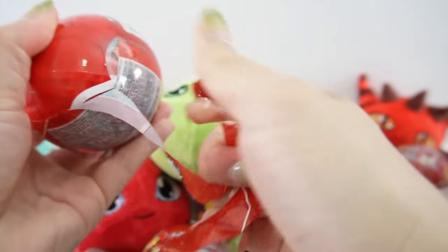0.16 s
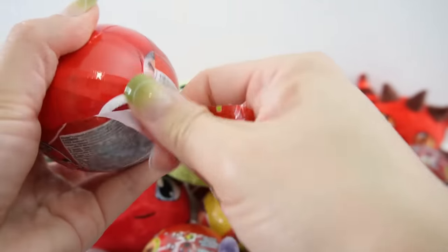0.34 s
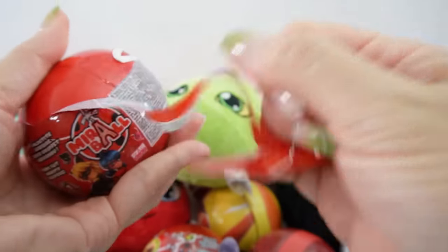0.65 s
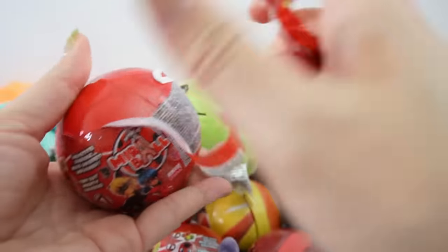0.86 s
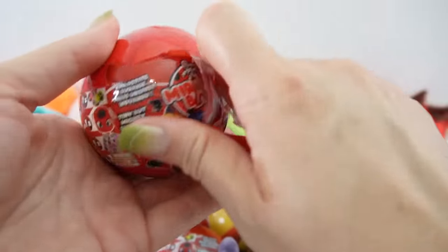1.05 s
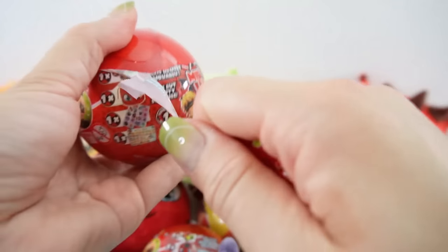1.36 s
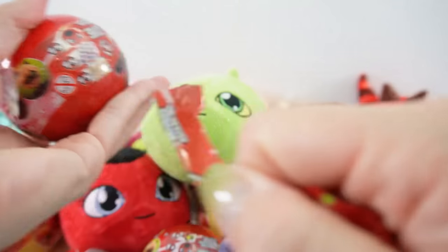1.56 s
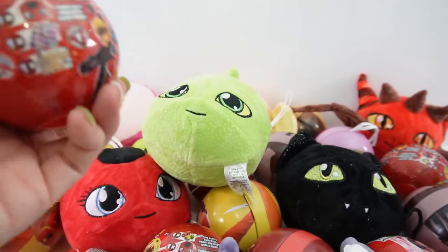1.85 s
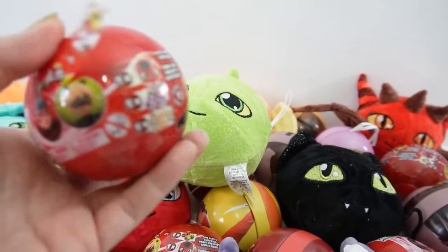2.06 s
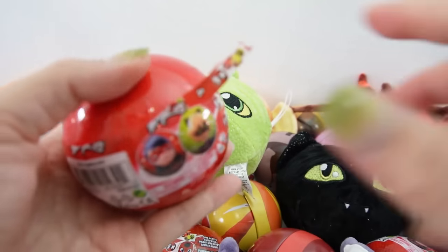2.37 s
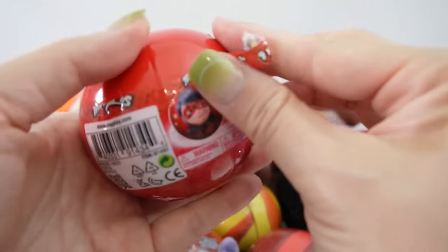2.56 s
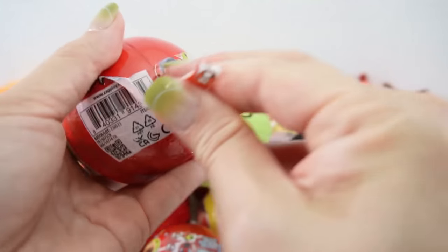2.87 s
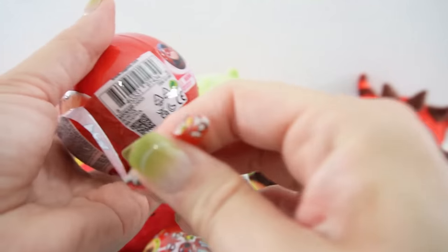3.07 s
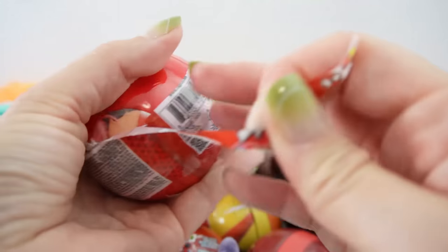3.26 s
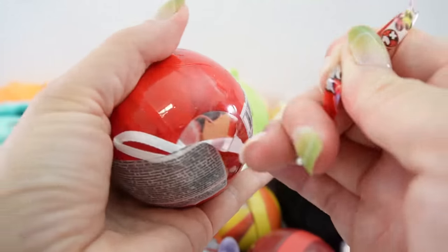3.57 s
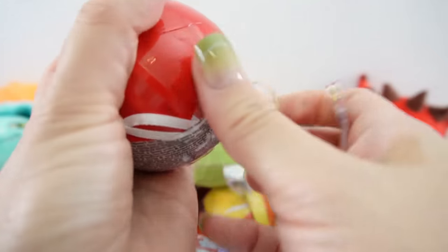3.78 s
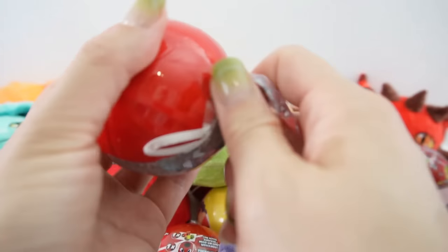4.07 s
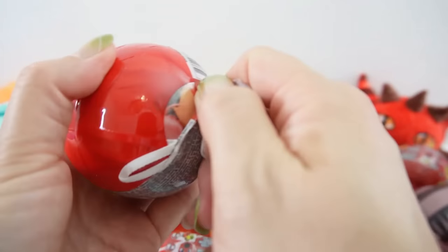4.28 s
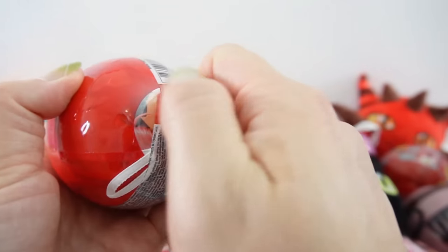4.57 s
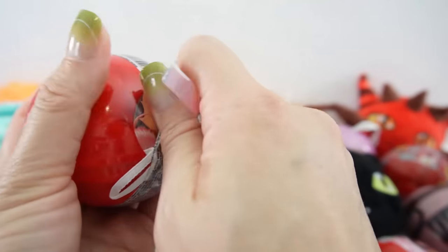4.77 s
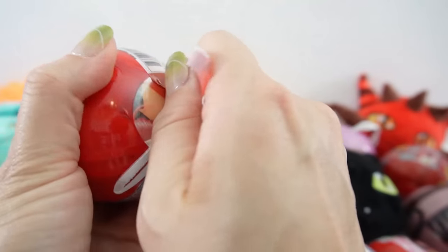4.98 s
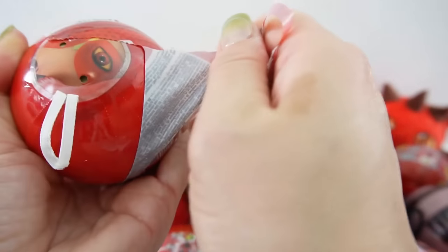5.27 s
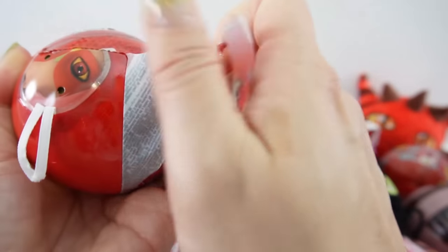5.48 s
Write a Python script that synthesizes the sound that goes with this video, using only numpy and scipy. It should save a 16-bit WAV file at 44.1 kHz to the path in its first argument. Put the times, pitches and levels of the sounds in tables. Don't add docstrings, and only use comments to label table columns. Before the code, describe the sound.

Tight plastic film is peeled off a hollow ball in loud, sharp crackling bursts, eases to faint picking, then rips loudly again.

```python
import sys
import numpy as np
from scipy import signal
from scipy.fft import rfft, irfft, next_fast_len
from scipy.io import wavfile
from scipy.ndimage import uniform_filter1d, map_coordinates

SR = 44100
rng = np.random.default_rng(int(sys.argv[2]) if len(sys.argv) > 2 else 0)


def to_linear_factor(level_db):
    exponent = np.asarray(level_db, float) / 20
    return 10 ** exponent


def materialize(psi):
    bounded = np.clip(np.atleast_2d(psi).T, -1, 1)
    quanta = np.round(bounded * 32767).astype(np.int16)
    wavfile.write(sys.argv[1], SR, quanta)


N = 248283

# pitch_hz, level_db [dB per Hz]
HISS_COLOUR = [(12, -51), (20, -15), (237, -4.5), (452, -13), (566, -1.5), (750, -14.5), (1840, -14.5),
               (3420, -18), (15200, -27), (16500, -24)]
# pitch_hz, width_hz, level_db
FAN_TONES = [(235, 67, -29), (573.3, 14.5, 15)]
# pitch_hz, likeness [0-1]
HUM_LIKENESS = [(60, 0.93), (290, 0.74), (1400, 0.48), (15000, 0.19)]
# peak_s, rustle_db, rise_s and fall_s [time to change by 20 dB]
FINGER_PULLS = [(.136, -19, 0.2, 0.17), (.477, -33.5, 0.57, 0.048), (.672, -20, 0.15, 0.13),
                (.814, -33, 0.063, 0.16), (0.976, -26.5, 0.036, 0.045), (1.101, -23.5, 0.11, 0.1),
                (1.285, -14, 0.04, 0.056), (1.477, -17.5, 0.026, 0.058), (1.512, -19, 0.02, 0.14),
                (1.68, -29.5, 0.033, 0.13), (2.009, -25.5, 0.44, 0.033), (2.185, -27.5, 0.11, 0.11),
                (2.255, -34, 0.025, 0.33), (2.409, -40.5, 0.042, 0.087), (2.6, -54, 0.047, 0.069),
                (2.69, -42, 0.038, 0.02), (2.84, -38, 0.065, 0.028), (2.926, -27, 0.021, 0.1),
                (3.225, -27, 0.027, 0.012), (3.424, -44.5, 0.36, 0.12), (3.508, -44, 0.089, 0.046),
                (3.645, -40.5, 0.05, 0.073), (3.7, -26.5, 0.059, 0.11), (4.092, -32, 0.025, 0.044),
                (4.186, -33, 0.034, 0.14), (4.268, -47, .01, 0.12), (4.325, -62, .2, .025),
                (4.495, -47, .01, 0.11), (4.575, -31.5, 0.059, 0.11), (4.785, -38, 0.026, 0.065),
                (4.816, -43, 0.049, 0.011), (5.094, -32.5, 0.15, 0.2), (5.29, -30.5, 0.075, 0.054),
                (5.471, -19.5, 0.033, 0.15)]
# time_s, tension [-1 slack to 1 tight]
FILM_TENSION = [(0, -0.91), (.14, -0.95), (.3, -0.035), (.45, -0.34), (.67, -0.23), (.95, -1.06),
                (1.1, -0.17), (1.5, -0.054), (2.55, -1.08), (2.69, 0.8), (2.8, -0.45), (3.2, 0.48),
                (3.42, 0.017), (3.65, -0.19), (4.3, 0.73), (4.8, 0.31), (5.09, 0.86), (5.63, -0.11)]
# pitch_hz, level_db [dB per Hz]
FILM_COLOUR = [(88, -44), (150, -32), (371, -15), (881, -11.5), (1050, -9), (1440, -9.5), (2700, -3.5),
               (5170, -2), (12800, -10), (15600, -17.5), (16500, -45)]
# start_s, peak_db,
# pitch_hz, top_db [treble]
FILM_CREASES = [(0.026, -24, 3060, -12), (0.043, -20, 2520, -54), (0.0555, -11.5, 2470, -16),
                (0.0598, -4.5, 2540, -9.5), (0.0767, -5.5, 6850, 4), (0.1032, -15, 2370, -27),
                (0.1275, -6.5, 4400, -26), (0.136, -10, 5400, -12), (0.1465, -10.5, 8400, 1),
                (0.1604, -6.5, 8800, -22), (0.1825, -9.5, 6700, -2), (0.194, -1.5, 3340, -9),
                (0.2351, -4, 5100, -7), (0.257, -3.5, 3400, -18), (0.268, -12, 2420, -15),
                (0.3037, -7.5, 5150, -5), (0.3364, -4, 5950, -1), (0.3459, -6.5, 6440, -7),
                (0.3614, -17, 4230, -20), (0.3848, -8, 4940, -7.5), (0.4047, -12, 2210, 0),
                (0.4228, -4.5, 2600, -13), (0.45, -31, 1960, -31), (0.4587, -6, 4400, -7),
                (.4673, -9.5, 5700, -4), (0.4842, -4.5, 2340, -9.5), (0.4922, -12.5, 3500, 1),
                (0.5192, -12.5, 5700, 1),
                (0.563, -18, 5070, -15), (0.575, -12.5, 3950, -14), (0.5887, -11.5, 2350, -22),
                        (0.6145, -5.5, 2430, -22), (0.6386, -6, 8300, -6), (0.653, -7, 4800, -20),
                        (0.6694, -7.5, 4800, -25), (0.7125, -5.5, 2320, -9), (0.7305, -5, 3300, -6.5),
                        (0.7844, -6.5, 4700, -15), (0.8083, -4, 3160, -1.5), (0.8168, -3, 4800, -2),
                        (0.847, -14, 2420, -8), (0.8591, -11.5, 5300, -16), (0.8862, -13.5, 2840, -6),
                        (0.9436, -13, 4500, -4), (1.0106, -25, 8500, -7), (1.076, -11, 2870, 4),
                        (1.099, -13, 5150, -10), (1.1068, -9.5, 5050, -10), (1.1258, -10, 4900, -15),
                        (1.135, -7.5, 4800, -12),
                (1.226, -26, 5700, -9), (1.2395, -15.5, 3560, -2), (1.266, -8.5, 4400, 4),
                       (1.269, -6, 2840, -6), (1.2942, -19, 4500, 5), (1.3127, -12.5, 2250, -6),
                       (1.41, -16.5, 2400, -13), (1.442, -4, 3070, 2.5), (1.4883, -16, 7800, 4),
                       (1.5048, -6, 6600, 3), (1.5096, -6.5, 2320, -3), (1.5272, -11, 6070, -11),
                       (1.5328, -2, 6900, -11), (1.5765, -5.5, 4350, -18), (1.5903, -5, 4250, -9),
                       (1.6681, -3, 4000, -8), (1.6806, -9, 5600, -16), (1.7379, -8, 5250, -2),
                       (1.7813, -19.5, 4600, -16), (1.81, -9.5, 5540, -15), (1.8245, -16, 2820, -8),
                       (1.8525, -24, 1720, -27),
                (1.899, -19, 5000, -21), (1.9164, -16, 5630, -11), (1.936, -13, 4170, -3),
                   (1.9827, -21.5, 8060, 18), (2.0891, -26.5, 4500, -12), (2.186, -15, 7900, -23),
                   (2.251, -29, 6760, -28), (2.4008, -26, 2800, -35), (2.4478, -27.5, 5000, -29),
                   (2.55, -27.5, 3330, -31), (2.7606, -33, 2730, -4), (2.8001, -32, 3500, -29),
                   (2.891, -34, 3080, -43), (2.908, -23, 3700, -15), (2.915, -21, 3600, -11),
                   (2.923, -22, 3080, -2), (2.934, -19, 3600, -15), (2.948, -21, 3260, -24),
                   (2.98, -19, 3050, -12),
                (3.0597, -29, 3770, -15), (3.097, -22, 3560, -9), (3.218, -18.5, 5200, 1),
                   (3.3355, -22, 3050, -20), (3.4184, -25.5, 2520, -8), (3.44, -27, 3730, 1),
                   (3.513, -22, 8540, -6), (3.652, -21.5, 3220, -12), (3.6907, -11, 9600, -11.5),
                   (3.713, -25, 4320, -11), (3.724, -24, 2460, -16), (3.745, -22, 5050, 0),
                   (3.909, -32, 3420, -26), (4.089, -27, 7000, -10), (4.0972, -16, 6500, -4),
                   (4.162, -22.5, 4700, -15), (4.177, -8.5, 5400, -12), (4.181, -10, 8100, -9),
                   (4.2626, -19, 7150, -1), (4.288, -27, 7350, 7), (4.4352, -36, 6200, 1),
                   (4.4867, -36, 7650, -1), (4.5494, -22, 5300, -7), (4.5629, -7, 4400, 6.5),
                   (4.5935, -14, 5200, -2), (4.6242, -20.5, 4000, -7), (4.712, -35.5, 4800, -4),
                   (4.7792, -32, 2520, -7), (4.803, -25.5, 5300, -6), (4.8362, -33.5, 1890, -6),
                (4.9864, -8.5, 8450, -13), (5.0397, -7.5, 4670, -2.5), (5.061, -7, 5600, -2),
                      (5.081, -5, 2760, -11), (5.185, -10.5, 6800, -18), (5.228, -8, 7500, -21),
                      (5.251, -8, 5840, -13), (5.292, -18.5, 5360, -26), (5.4324, -13, 5350, -15),
                      (5.4376, 0.5, 5500, -13.5), (5.4601, -5, 5330, -5.5), (5.4752, -7.5, 6600, 0),
                      (5.4915, 0.5, 6540, -16.5), (5.4936, -5, 4600, -17), (5.619, -4, 8200, -13)]
# pitch_hz, t60_s [time to fall 60 dB]
ROOM_DECAY = [(300, 0.32), (2000, 0.19), (6000, 0.29), (15000, 0.38)]
# start_s, length_s, level_db, from_hz, to_hz
FILM_DRAGS = [(0.096, 0.066, -45.5, 404, 263), (0.445, 0.014, -48.5, 303, 191),
              (1.264, 0.033, -33.5, 4270, 4190), (1.289, 0.033, -33.5, 2750, 2434),
              (1.478, 0.027, -27.5, 2452, 2810), (1.956, 0.0708, -38, 2733, 3070),
              (2.767, 0.041, -53, 3505, 3430), (2.823, 0.038, -47, 2915, 1874),
              (2.836, 0.027, -44.5, 3400, 2950), (2.825, 0.038, -51, 5420, 5200),
              (2.918, .055, -31, 3000, 3810), (4.267, 0.056, -42, 9500, 10380),
              (4.49, 0.081, -48.5, 8570, 7960), (4.767, 0.048, -44.5, 7950, 8370),
              (1.477, 0.021, -25, 8000, 8200), (5.083, 0.069, -43.5, 2810, 2600),
              (5.239, 0.057, -46.5, 1800, 885), (5.485, 0.02, -47, 232, 150)]
# start_s, peak_db, pitch_hz, t60_s, sag [0-2, extra pitch at the start]
BALL_KNOCKS = [
    (0.137, -50, 295, 0.097, 0.16),
    (1.27, -50, 370, 0.052, 0.25),
    (1.296, -43, 320, 0.05, 0.2),
    (5.49, -37, 360, 0.066, 0.097),
]
# start_s, peak_db, pitch_hz,
# top_db [treble]
SHORT_TICKS = [(0.3827, -16, 2480, -1), (0.2314, -8, 4360, -14), (0.2526, -10.5, 2500, -8),
                (0.299, -18, 3230, -18), (0.3075, -12.5, 3530, -7), (0.359, -13.5, 4390, -15),
                (0.431, -30, 2840, -12), (0.4794, -19, 2890, -7), (0.5031, -25, 4200, 3),
                (0.509, -23, 5210, -5), (0.5384, -27, 7620, -1), (0.5559, -27, 3960, 4),
                (0.559, -23, 4550, -8), (0.5626, -12.5, 7500, -10), (0.5964, -18, 4870, -14),
                (0.396, -19, 2260, -12), (0.679, -19, 4350, -13), (0.7043, -25, 7280, -2),
                (0.749, -19, 6030, 0), (0.7843, -13, 2800, -10), (0.9302, -26, 1950, -6),
                (0.965, -25, 3880, -13), (1.0947, -22, 5210, -11), (1.1033, -15, 5700, -18),
                (1.1169, -22, 3790, -14), (1.1305, -11, 3900, -7), (1.1556, -19, 3790, -5),
                (1.4007, -31, 4010, -11), (1.4784, -11.5, 2840, 1), (1.5062, -6, 2320, -11),
                (1.602, -14, 4390, -10), (1.6131, -31, 4220, -9), (1.6226, -20, 4740, -14),
                (1.707, -22, 3920, -20), (1.72, -21, 3270, -15), (1.724, -22, 2500, -3),
                (1.7301, -22, 3630, -9), (1.796, -22, 5600, -9), (1.8197, -25.5, 2790, -14),
                (1.8542, -21, 4700, -21), (1.8735, -27, 5430, -15), (1.9115, -26, 3750, -17),
                (1.9813, -29, 3060, -8), (2.012, -20, 3060, -2), (2.021, -18, 4200, -2),
                (2.0454, -33, 2970, -7),
                (2.0925, -24, 4100, -5), (2.1089, -29, 5640, -12), (2.1142, -26.5, 5340, -15),
               (2.171, -26, 5640, -23), (2.254, -27, 5510, -16), (2.3515, -33, 3880, -9),
               (2.4757, -34, 5170, 8), (2.508, -43, 3094, -16), (2.5194, -47, 3597, -13),
               (2.6029, -36, 2710, -14), (2.775, -37, 3400, -10), (2.7791, -46, 3400, -9),
               (2.8498, -39, 2150, -20), (2.8605, -38, 2970, -24), (2.9046, -25, 3010, -21),
               (2.9486, -14, 3300, -14), (2.9165, -12, 3000, -19), (0.411, -9.5, 1300, -23),
               (3.16, -38, 3490, -4), (3.1745, -42, 3450, -13), (3.1897, -40, 3700, -2),
               (3.213, -29, 6160, -7), (3.5157, -27, 8500, -8), (3.5402, -35, 3640, 3),
               (0.638, -14.5, 1640, -25), (3.954, -40.5, 2710, -2), (4.8045, -30.5, 2500, -8),
               (4.193, -19, 7320, -8), (4.33, -27.5, 6240, 13), (4.5634, -19.5, 2550, -5),
               (4.4914, -31.5, 7970, 1), (0.688, -24, 1700, -25), (4.7029, -35, 5600, 4),
               (4.811, -27, 8790, -9), (4.815, -39, 5470, -4), (4.8191, -26.5, 1910, -6),
               (4.9714, -47, 8910, 6), (5.001, -20, 8140, 0), (5.0778, -17, 5810, -2),
               (5.102, -15.5, 4100, -11), (5.113, -22.5, 2800, -10), (5.127, -20, 5900, -10),
               (1.2697, -12, 4970, -10), (5.2445, -24, 3080, -15), (5.4552, -12, 5380, -11),
               (5.4743, -5, 6240, -10)]
# start_s, peak_db, pitch_hz
SHELL_FLEXES = [(0.407, -20, 1120), (.42, -17, 610), (.43, -20.5, 1300), (.448, -20, 915),
                (0.589, -39, 1570), (.614, -22, 1100), (0.713, -22, 1360), (0.737, -26, 500),
                (.885, -27.5, 1270), (.941, -17.5, 1410), (1.073, -29, 1050), (4.562, -30, 1630),
                (1.299, -25, 1150), (1.442, -13, 1820), (1.528, -24, 1220), (1.669, -20, 1650),
                (1.854, -37, 1690), (5.226, -20, 1880), (5.247, -40, 1460), (5.257, -39, 1400),
                (5.282, -32, 930), (5.437, -23, 1100), (5.49, -22, 795)]
# time_s, pan_db [left minus right]
BALL_POSITION = [
    (0.0, 0.5),
    (2.43, -3.5),
    (2.73, 0),
    (5.63, -0.5),
]
# pitch_hz, likeness [0-1]
NEAR_LIKENESS = [(500, 0.99), (2000, 1), (5000, 0.89), (9000, 0.84), (14000, 0.02)]


def unit(x):
    return x / np.sqrt(np.mean(x ** 2) + 1e-20)


def along(points, hz):
    f, v = np.transpose(points)
    return np.interp(np.log(hz + 1), np.log(f + 1), v)


def curves(rows):
    s, *cols = np.transpose(rows)
    return [np.interp(np.arange(N) / SR, s, c) for c in cols]


def wobble(rate):
    points = rng.standard_normal(int(N * rate / SR) + 4)
    return map_coordinates(points, [np.arange(N) * rate / SR])


def noise_pair():
    return rng.standard_normal((2, N))


def filtered(x, response):
    size = next_fast_len(N + 8192)
    return irfft(rfft(x, size) * response(np.fft.rfftfreq(size, 1 / SR)), size)[..., :N]


def resonance(f, hz, width):
    return 1j * f * width / (hz * hz - f * f + 1j * f * width + 1e-9)


def treble_shelf(f):
    return 1 / (1 + (8000 / (f + 1)) ** 6)


def ports(pair, alike):
    def shares(hz):
        turn = np.arccos(np.clip(along(alike, hz), -1, 1)) / 2
        return np.array([np.cos(turn), np.sin(turn)])

    mid, side = filtered(pair, shares)
    return np.array([mid + side, mid - side])


def hum():
    bed = unit(filtered(noise_pair(), lambda f: to_linear_factor(along(HISS_COLOUR, f))))

    def tones(f):
        return sum(to_linear_factor(db) * resonance(f, hz, width) ** 2 for hz, width, db in FAN_TONES)

    fan = unit(filtered(noise_pair(), tones)) * to_linear_factor(6.6 * wobble(9.4))
    return ports(to_linear_factor(-54.0) * bed + to_linear_factor(-67.0) * fan, HUM_LIKENESS)


def handling():
    t = np.arange(N) / SR
    total = 0
    for s, db, rise, fall in FINGER_PULLS:
        distance = np.maximum((s - t) / rise, (t - s) / fall)
        total = total + to_linear_factor(db - 20 * distance)
    return total


def cracks(s, db, hz, ms, top_db, thump_db, size, sharp=6, ring_db=12, lumpy_db=5):
    def col(v):
        return np.asarray(v)[:, None]

    t, f = np.arange(size) / SR, np.fft.rfftfreq(2 * size, 1 / SR)
    noise = rng.standard_normal((len(s), 3, size))
    lumps = to_linear_factor(lumpy_db * 2.7 * uniform_filter1d(noise[:, 2], size=16, axis=1))
    onset = 1 - np.exp(-t / (0.00008 * col(ms)))
    fade = to_linear_factor(-11 * t / (col(ms) / 1000)) * onset * lumps
    fade = fade * (1 + 1.26 * np.exp(-t / 0.00035))
    fade = fade + 1.5 * np.exp(-((t - 0.0004) / 0.00008) ** 2)

    top = (col(top_db) + 10.5) * treble_shelf(f)
    thump = (col(thump_db) + 17.0) / (1 + (f / 1400) ** 6)
    ring = 1 + to_linear_factor(ring_db) * resonance(f, col(hz), col(hz) / sharp)
    other_hz = 2000 * 4 ** rng.random((len(s), 1))
    ring = ring - to_linear_factor(ring_db - 9.5) * resonance(f, other_hz, other_hz / sharp)
    bounce = 1 + 0.11 * np.exp(-2j * np.pi * f * 0.0027)
    colour = to_linear_factor(along(FILM_COLOUR, f) + top + thump) * ring * bounce

    margin = 64
    late = np.exp(-2j * np.pi * f * margin / SR)
    burst = irfft(rfft(noise[:, :2] * fade[:, None], 2 * size) * (colour * late)[:, None])
    power = uniform_filter1d(burst ** 2, size=40, axis=2)
    peak = np.sqrt(abs(power).max(2, keepdims=True))
    burst = burst / peak * to_linear_factor(col(db) - 3.5)[:, None]
    at = (np.round(col(s) * SR).astype(int) + np.arange(2 * size)).ravel()
    sides = [np.bincount(at, burst[:, k].ravel(), N + 4 * size) for k in (0, 1)]
    return np.array(sides)[:, margin:N + margin]


def rustle(count=2200):
    tension, = curves(FILM_TENSION)
    film_hz = 4310 * 2 ** (0.42 * tension)
    top_db = 0.5 + 4.5 * tension
    draw = rng.random((count, 4))
    s = draw[:, 0] * (N - 1) / SR
    at = (s * SR).astype(int)
    size_db = -3.5 * np.log(draw[:, 1] + 0.12) + 3.14 * wobble(45)[at]
    pitch_hz = film_hz[at] * 4.7 ** (draw[:, 2] - 0.5)
    ms = 0.64 + 7 * draw[:, 3] ** 2
    thump_db = np.full(count, -23)
    grains = unit(cracks(s, size_db, pitch_hz, ms, top_db[at], thump_db, size=256, ring_db=21.0))

    slide = unit(filtered(noise_pair(), lambda f: to_linear_factor(along(FILM_COLOUR, f))))
    fizz = filtered(slide, treble_shelf)
    slide = slide + (to_linear_factor(top_db) - 1) * fizz
    return handling() * (to_linear_factor(-6.0) * grains + to_linear_factor(-10.0) * slide)


def snaps():
    creases = (FILM_CREASES)
    s, db, hz, top_db = np.transpose(creases)
    tension = np.interp(s, *np.transpose(FILM_TENSION))
    give_ms, ring_cycles = 2.21, 4.44
    ms = (give_ms + 1000 * ring_cycles / hz) * to_linear_factor(-0.18 * (db + 6.5))
    thump_db = -28 - 0.43 * (db + 9.0) - 6.5 * tension
    return cracks(s, db, hz, ms, top_db, thump_db, size=1024, sharp=4.4, ring_db=9.5)


def room(x):
    out, step = np.zeros((2, N + SR)), 8192
    dull = filtered(x, lambda f: 1 / (1 + 1j * f / 7000))
    for a in range(0, N, step):
        hz, t, z = signal.stft(rng.standard_normal((2, SR // 2)), SR, nperseg=256)
        decay = to_linear_factor(-60 * t / along(ROOM_DECAY, hz)[:, None])
        tail = signal.istft(z * decay, SR, nperseg=256)[1]
        tail = tail * (1 - np.exp(-np.arange(tail.shape[1]) / SR / 0.0035))
        tail = tail / np.linalg.norm(tail[0])
        wet = signal.fftconvolve(dull[None, a:a + step], tail, axes=1)
        out[:, a:a + wet.shape[1]] += wet
    return out[:, :N]


def drags():
    out = np.zeros((2, N + SR))
    lumps = to_linear_factor(3 * wobble(160))
    sharp, edge_s = 7.7, 0.0044
    t = np.arange(8192) / SR
    for s, length, db, from_hz, to_hz in FILM_DRAGS:
        hz = from_hz * (to_hz / from_hz) ** np.clip(t / length, 0, 1)
        noise = rng.standard_normal((2, 2, len(t)))
        width_hz = from_hz * (1 + (from_hz / 5500) ** 4) / sharp
        keep = np.exp(-np.pi * width_hz / SR)
        sway = signal.lfilter([1], [1, -2 * keep, keep ** 2], noise[0] + 1j * noise[1])
        song = (sway * np.exp(2j * np.pi * np.cumsum(hz) / SR)).real
        thin = signal.butter(2, to_hz / 4, 'high', fs=SR, output='sos')
        song = unit(signal.sosfilt(thin, song))
        shape = np.clip(np.minimum(t, length + edge_s - t) / edge_s, 0, 1)
        out[:, round(s * SR):][:, :len(t)] += to_linear_factor(db) * shape * song
    return out[:, :N] * lumps


def knocks():
    out, t = np.zeros(N + SR), np.arange(SR // 4) / SR
    for s, db, hz, t60, sag in BALL_KNOCKS:
        turns = np.cumsum(hz * (1 + sag * np.exp(-t / 0.022))) / SR
        fade = to_linear_factor(db - 60 * t / t60) * (1 - np.exp(-t / 0.0027))
        out[round(s * SR):][:len(t)] += 2 * np.sin(2 * np.pi * turns) * fade
    return out[:N] * (1 + 1.5 * wobble(250))


def ticks():
    s, db, hz, top_db = np.transpose(SHORT_TICKS)
    give_ms, ring_cycles = 2.3, 4.2
    ms = give_ms + 1000 * ring_cycles / hz
    thump_db = np.full(len(s), -27.0)
    return cracks(s, db + 0.5, hz, ms, top_db, thump_db, size=384, sharp=8.6, ring_db=13.0)


def flexes():
    s, db, hz = np.transpose(SHELL_FLEXES)
    ms = 1000 * 6.4 / hz
    top_db, body_db = np.full(len(s), -31.0), np.full(len(s), -14.5)
    return cracks(s, db + 0.5, hz, ms, top_db, body_db, size=1024, sharp=3.5, ring_db=10.0)


def scene():
    def quiet_band(f):
        return f < 15900

    film = filtered(rustle(), quiet_band) + snaps()
    film = film + filtered(drags(), quiet_band)
    film = film + knocks() * [[1], [0]]
    film = film + ticks() + flexes()
    pan_db, = curves(BALL_POSITION)
    near = ports(film, NEAR_LIKENESS) * to_linear_factor([pan_db / 2, -pan_db / 2])
    answer = to_linear_factor(-6.5) * ports(room(film[0]), [(500, 0.98), (3000, 0.96), (12000, 0.091)])
    return near + filtered(answer + hum(), quiet_band)


def band_limit(x):
    return signal.sosfilt(signal.butter(12, 16860, fs=SR, output="sos"), x)


def record(dry):
    near = filtered(dry, lambda f: (1j * f / (1j * f + 25)) ** 2)
    excess = near - near / (1 + abs(near / 0.91) ** 12) ** (1 / 12)
    shaved = near - filtered(excess, lambda f: f > 700)
    return band_limit(shaved)


dry = scene()
out = record(dry)
materialize(out)
```